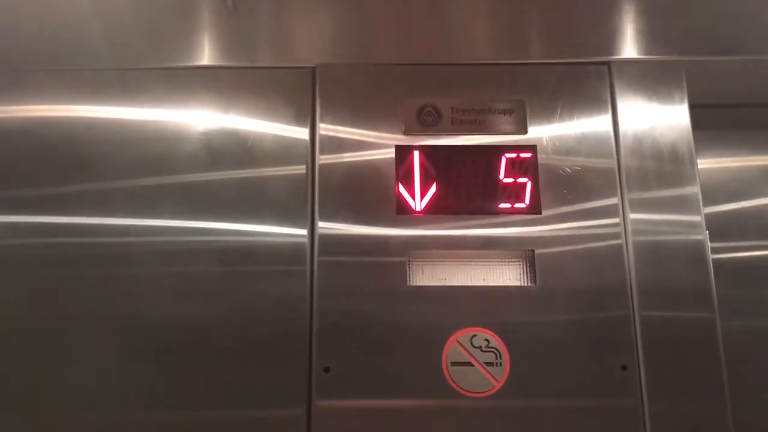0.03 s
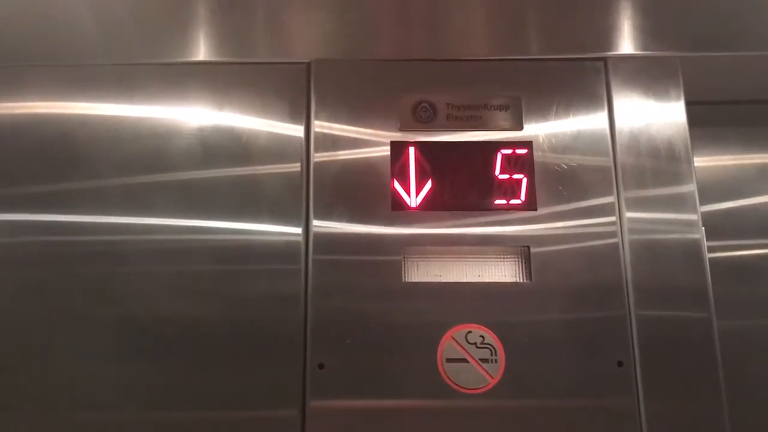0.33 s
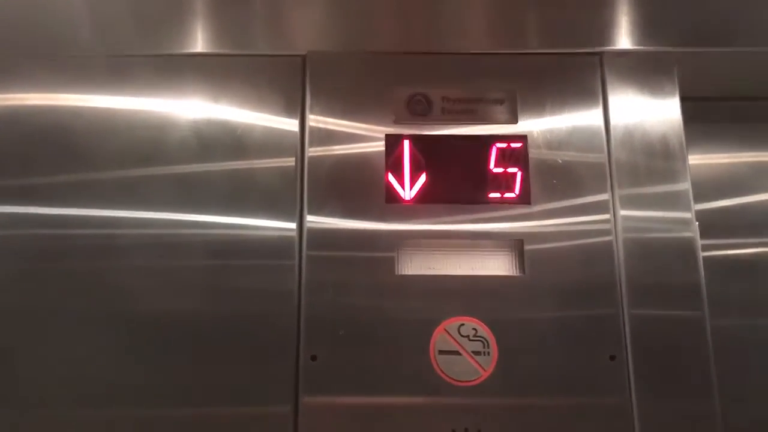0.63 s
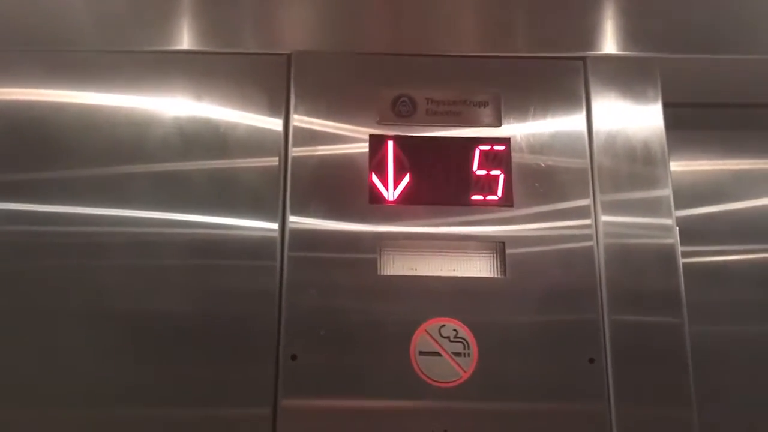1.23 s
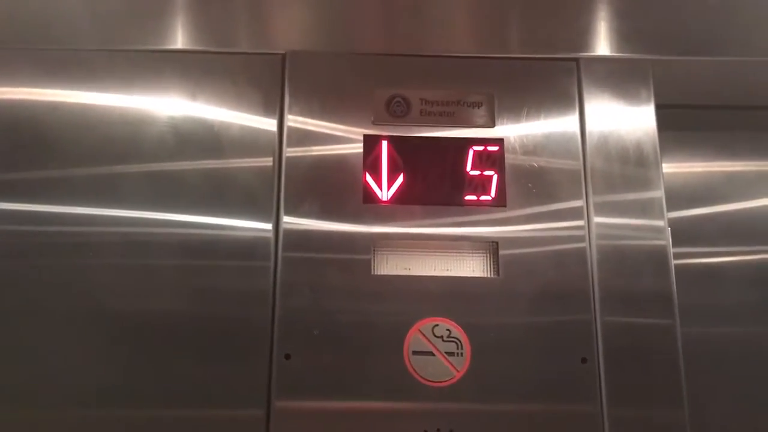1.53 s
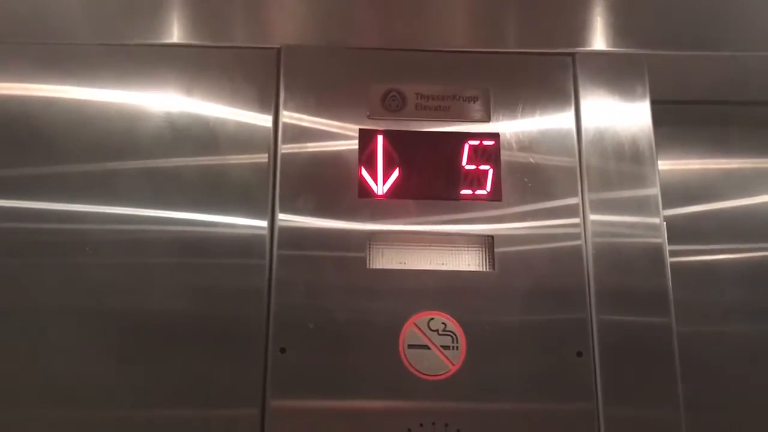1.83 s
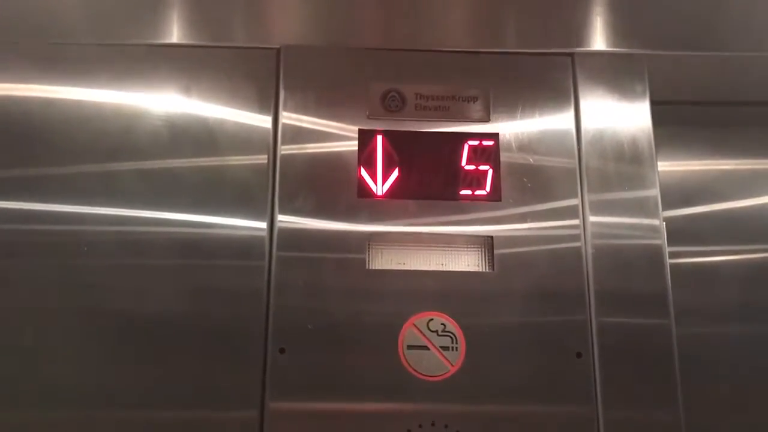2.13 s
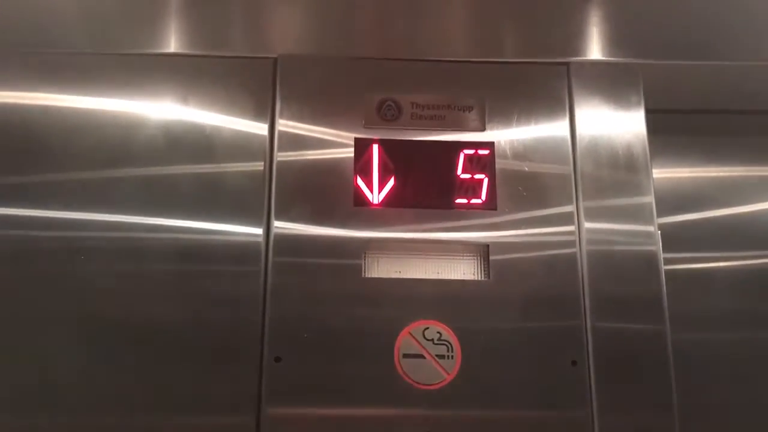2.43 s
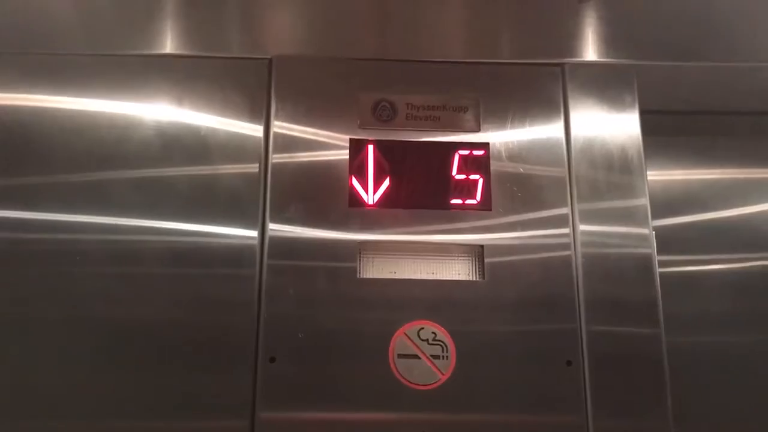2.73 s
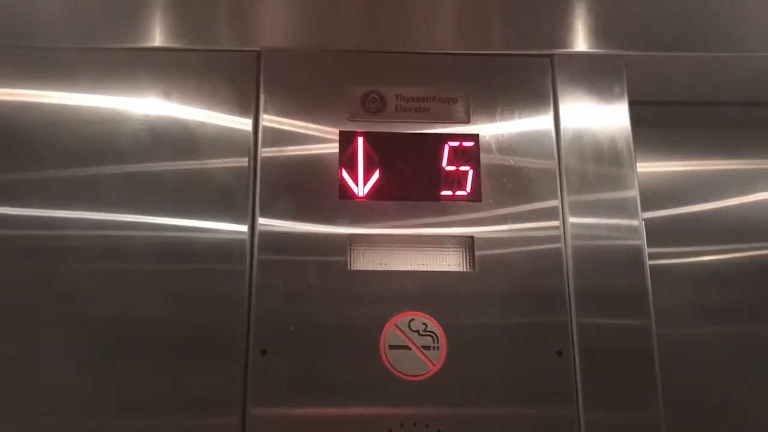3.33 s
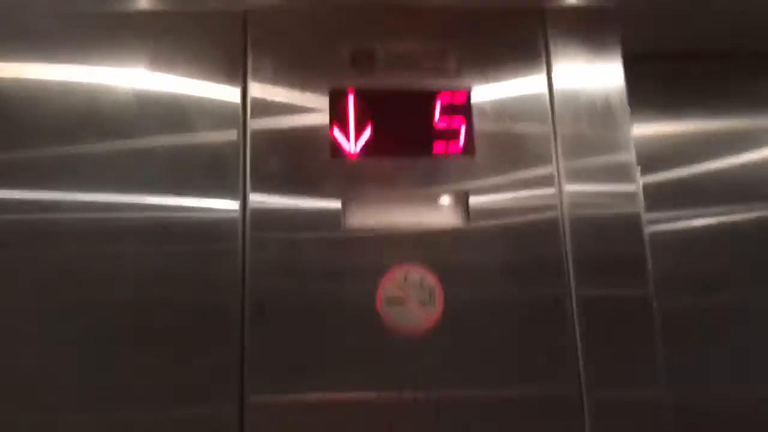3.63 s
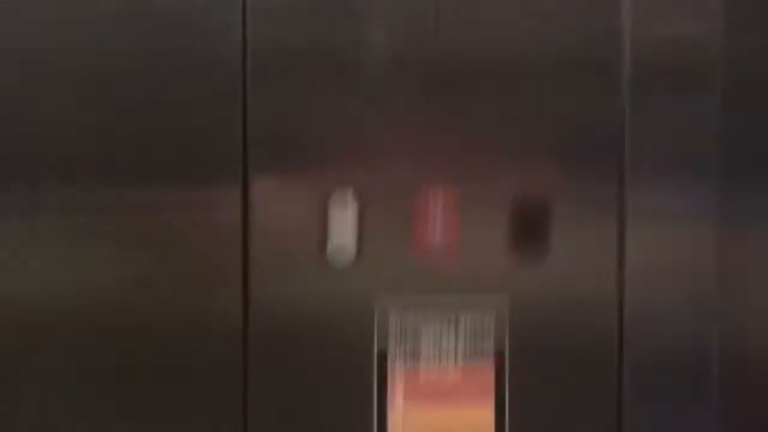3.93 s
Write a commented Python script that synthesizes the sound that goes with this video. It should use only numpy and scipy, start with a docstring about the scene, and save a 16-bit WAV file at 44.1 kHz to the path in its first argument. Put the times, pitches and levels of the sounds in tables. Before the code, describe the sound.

An elevator hums to a stop, then clicks and its sliding doors start rolling.

```python
"""A fan, a low boom and the hum and whine of the drive, heard inside a steel lift car coming to rest.
The drive cuts out; brake and levelling jolts stir the car's lowest air mode and shake its panels.
Relays and latches click, steel fittings ring on. The sliding doors unlock and start to roll,
knocking as they take up their slack. The ventilation fan runs throughout."""
import sys
import numpy as np
from scipy import signal
from scipy.fft import rfft, irfft
from scipy.io import wavfile

SR = 44100
rng = np.random.default_rng(int(sys.argv[2]) if len(sys.argv) > 2 else 0)


def file_out(sig):
    """Save sig as 16-bit WAV at sys.argv[1]."""
    # one column per channel
    cols = np.atleast_2d(sig).T
    # limit, then scale
    lim = np.clip(cols, -1, 1)
    pcm = np.round(lim * 32767).astype(np.int16)
    wavfile.write(sys.argv[1], SR, pcm)


N = 176400  # 4 s


def undb(db):
    """Decibels to gain."""
    return 10 ** (np.asarray(db) / 20)


def unit(x):
    """Scale to rms 1."""
    return x / np.sqrt(np.mean(x ** 2))


def clock():
    """Time of every sample, s."""
    return np.arange(N) / SR


def colour(x, spectrum):
    """Minimum-phase filter through (Hz, dB) points; white noise keeps its power."""
    hz, db = np.array(sorted(spectrum), float).T
    size = 2 * N
    bins_hz = np.maximum(np.arange(N + 1) * SR / size, 1)
    gain = unit(undb(np.interp(np.log(bins_hz), np.log(hz), db)))
    cepstrum = irfft(np.log(gain))
    cepstrum[1:N] *= 2
    cepstrum[N + 1:] = 0
    return irfft(rfft(x, size) * np.exp(rfft(cepstrum)))[:N]


def noise(spectrum):
    """Coloured noise, rms 1."""
    return unit(colour(rng.standard_normal(N), spectrum))


def gritty(spectrum, grains_per_s, grain_db):
    """Coloured noise with small random impacts in it, rms 1."""
    grains = unit((rng.random(N) < grains_per_s / SR) * rng.standard_normal(N))
    return unit(colour(rng.standard_normal(N) + undb(grain_db) * grains, spectrum))


def band(hz, width_hz):
    """Noise in one steep resonance, rms 1."""
    bins_hz = np.arange(N // 2 + 1) * SR / N
    detuning = (bins_hz - hz) / (width_hz / 2)
    return unit(irfft(rfft(rng.standard_normal(N)) / (1 + detuning ** 2), N))


def walk(rate_hz):
    """Smooth random wander, rms 1."""
    bins_hz = np.arange(N // 2 + 1) * SR / N
    return unit(irfft(rfft(rng.standard_normal(N)) * np.exp(-(bins_hz / rate_hz) ** 2), N))


def tones(rows, drift_hz, waver_db, rate_hz):
    """Machine tones wavering in pitch and level."""
    out = 0
    for hz, db in rows:
        rms = undb(db + waver_db * walk(rate_hz))
        phase = 2 * np.pi * np.cumsum(hz + drift_hz * walk(rate_hz)) / SR
        out += np.sqrt(2) * rms * np.sin(phase)
    return out


def swell(start_s, rise_s, t60_s, hold_s=0):
    """Linear rise, hold, exponential decay."""
    age_s = clock() - start_s
    decay = np.exp(-np.log(1000) * np.maximum(age_s - rise_s - hold_s, 0) / t60_s)
    return np.clip(age_s / rise_s, 0, 1) * decay


# Air noise spectra, main and treble (frequency [Hz], relative level [dB])
AIR_SPECTRUM = [(15, -29.5), (25, -1), (53, -14), (86, -8), (116, -12.5), (140, -23), (173, -18.5),
                (198, -21), (240, -20), (281, -27.5), (313, -30.5), (349, -28.5), (445, -27.5),
                (537, -30.5), (614, -34), (684, -38), (762, -33.5), (970, -37), (1050, -38), (1140, -38.5),
                (1400, -38.5), (2100, -47), (4750, -57.5), (7500, -66), (15500, -69)]
AIR_TREBLE_SPECTRUM = [(3000, -16), (5400, 1.5), (7500, 4), (12000, -1), (15500, -3.5)]
# Fan tones (frequency [Hz], level [dB])
FAN_TONES = [(80.7, -45), (119, -52), (161.5, -61), (231.5, -66.5), (317.6, -69.5), (446.8, -67),
             (1017, -74), (1082, -70)]
def fan(air_db=-43, treble_db=-75.5):
    """Ventilation fan: steady air noise and wavering tones."""
    air = undb(air_db) * noise(AIR_SPECTRUM) + undb(treble_db) * noise(AIR_TREBLE_SPECTRUM)
    return air + tones(FAN_TONES, drift_hz=1.13, waver_db=3.0, rate_hz=5.9)


BOOM_HZ = 83
# Boom envelope (time [s], level [dB])
BOOM_ENVELOPE = [(0, -39), (.7, -42.5), (.9, -73), (1.1, -45.5), (1.6, -37.5), (2.03, -36.5), (2.2, -54),
                 (2.55, -39), (2.9, -43), (3.12, -33), (3.4, -35.5), (4, -46)]
def boom():
    """The car's lowest air mode, stirred by the ride."""
    times_s, db = np.array(BOOM_ENVELOPE).T
    return undb(np.interp(clock(), times_s, db)) * band(BOOM_HZ, width_hz=33.5)


# Motor and inverter tones (frequency [Hz], level [dB])
MOTOR_TONES = [(268.5, -49.5), (387.6, -66), (506, -56.5), (538.3, -62), (560, -61), (699.8, -63.5),
               (762, -64), (780.6, -69.5), (829, -65.5), (1082, -75), (1351, -67.5), (1545, -72),
               (1700, -71.5), (2794, -71.5), (2858, -90)]
INVERTER_TONES = [(11859, -79.5), (12134, -78.5)]
# Resonances of the rushing noise (centre [Hz], width [Hz], level [dB])
RUSH_BANDS = [(272, 66, -54.5), (539.5, 31, -55.5), (791, 78, -55), (1075, 100, -63.5), (1296, 120, -69),
              (1550, 77, -67), (5440, 700, -87)]
# Motor whistle envelope (time [s], level [dB])
WHISTLE_ENVELOPE = [(0, -60.5), (.3, -74), (.65, -67.5), (.95, -66), (1.2, -66)]
# Drive hiss spectrum (frequency [Hz], relative level [dB])
HISS_SPECTRUM = [(150, -12), (300, -1.5), (480, 3), (630, -17), (900, -4), (1600, -8.5), (2000, -17.5),
                 (2700, -11.5), (3200, -23.5), (5700, -29), (7400, -43), (9200, -34), (10500, -37),
                 (15000, -39)]
def drive(cut_s=1.14, decay_tau_s=0.11, whine_fade_s=0.67, whine_fall_db_per_s=13):
    """Motor hum, rush, whistle and hiss die away at the power cut; the inverter whine fades earlier."""
    t = clock()
    hum = tones(MOTOR_TONES, drift_hz=1.88, waver_db=0.5, rate_hz=6.2)
    rush = sum(undb(db) * band(hz, width_hz) for hz, width_hz, db in RUSH_BANDS)
    times_s, whistle_db = np.array(WHISTLE_ENVELOPE).T
    whistle = undb(np.interp(t, times_s, whistle_db)) * band(hz=2810, width_hz=66)
    whine = tones(INVERTER_TONES, drift_hz=2.8, waver_db=0.5, rate_hz=12)
    whine += undb(-82) * band(hz=12240, width_hz=260)
    whine *= undb(-whine_fall_db_per_s * np.maximum(t - whine_fade_s, 0))
    hiss = undb(-55.5) * noise(HISS_SPECTRUM)
    running = np.exp(-np.maximum(t - cut_s, 0) / decay_tau_s)
    return running * (hum + rush + whistle + whine + hiss)


# Wall panel and fitting spectra (frequency [Hz], relative level [dB])
PANEL_SPECTRUM = [(60, -25), (120, -21), (185, -5.5), (205, -10), (228, -1), (252, 9), (285, -10.5),
                  (330, -8), (450, -8), (700, -29), (1500, -39.5), (4000, -61), (16000, -92.5)]
RATTLE_SPECTRUM = [(160, -30), (280, -25), (333, 3), (400, -4.5), (525, -16), (720, -7.5), (803, -13),
                   (1100, -7.5), (1330, -15.5), (1460, -9.5), (1790, -17), (2870, -24.5), (3470, -29.5),
                   (4530, -32.5), (5800, -40), (8000, -41), (15600, -80)]
# Car jolts (time [s], rise [s], hold [s], t60 [s], boom [Hz], boom [dB], panel [dB], rattle [dB])
JOLTS = [(0.486, 0.031, 0.0072, 0.17, 87.76, -31.5, -68, -79),
         (1.148, 0.034, 0.006, 0.09, 79.5, -35, -38, -50.5),
         (1.186, 0.023, 0.0085, 0.38, 80.9, -29, -37, -49.5),
         (1.35, 0.051, 0.0098, .28, 85.4, -25, -57, -61.5),
         (1.749, 0.019, 0.052, 0.17, 80.63, -27, -48.5, -46.5),
         (1.819, 0.04, 0.021, 0.54, 82, -24.5, -43.5, -49), (1.99, .02, .005, 0.16, 81.9, -33.5, -65, -59),
         (2.833, 0.018, 0.0048, 0.071, 85.96, -28, -71, -70),
         (3.184, 0.037, 0.027, 0.36, 87.6, -25, -40.5, -48)]
def jolts():
    """Each jolt swells the car's lowest air mode, shakes the panels and rattles the fittings."""
    panel = noise(PANEL_SPECTRUM)
    rattle = gritty(RATTLE_SPECTRUM, grains_per_s=400, grain_db=-5)
    shaking, boom_power = 0, 1e-12
    weighted_hz = boom_power * BOOM_HZ
    for start_s, rise_s, hold_s, t60_s, hz, boom_db, panel_db, rattle_db in JOLTS:
        envelope = swell(start_s, rise_s, t60_s, hold_s)
        shaking += envelope * (undb(panel_db) * panel + undb(rattle_db) * rattle)
        power = (envelope * undb(boom_db)) ** 2
        boom_power += power
        weighted_hz += power * hz
    phase = 2 * np.pi * np.cumsum(weighted_hz / boom_power) / SR  # one mode, power-weighted pitch
    return shaking + np.sqrt(2 * boom_power) * np.sin(phase)


CLICK_RISE_S = 0.002
# Ringing spectrum per switching part (frequency [Hz], relative level [dB])
PART_SPECTRA = {"brake": [(2120, -50), (3600, -26), (4220, -2.5), (4890, -19), (5330, -5), (5810, -2.5),
                (7610, -18), (10300, -24), (11500, -14), (14300, -18), (15600, -14)],
                "contact": [(1760, -49), (3000, -2), (3590, -11), (3820, -6), (4420, -12), (5000, -13),
                (5290, -7), (6240, -16), (7470, -9), (8390, 3), (10400, -26), (15600, -8)],
                "contactor": [(1470, -28), (2500, -3), (2960, -4), (3240, 1), (4440, -2), (4870, -8),
                (5940, 4), (6610, -11), (9340, -3), (10600, -11), (13000, -1), (15600, -15)],
                "relay": [(1120, -31), (1900, -4), (2170, -12), (2250, 2), (2730, -8), (3220, 2.5),
                (3950, -7), (4270, -7), (4790, -13), (5660, -10), (6300, -9), (7640, -14), (9030, 2),
                (9530, -5), (10700, -22), (12100, -10), (15600, -26)], "door relay": [(1290, -42),
                (2200, -12), (2720, -7), (3400, -1), (3750, -10), (4170, -7), (5740, -22), (6540, -4),
                (7160, -15), (7580, -11), (9010, -13), (9700, -5), (10400, -20), (11100, -8), (12300, -14),
                (14600, -7), (15600, -12)], "lock": [(1290, -46), (2200, -1.5), (3590, 1.5), (4610, -8),
                (4830, -4), (5500, -5.5), (7280, -17), (7950, -8), (8620, -21), (11300, -23), (15000, -33)],
                "hanger": [(1470, -33), (2500, 4.5), (2940, -22), (3610, 2), (3900, -4), (4370, -3),
                (7140, -8), (7770, -8.5), (11500, -5.5), (15600, -20)]}
# Clicks (time [s], level [dB], t60 [s], part)
CLICKS = [(1.044, -61, 0.088, "brake"), (1.066, -64, 0.36, "brake"), (1.126, -63.5, 0.18, "brake"),
          (1.1465, -60, 0.2, "brake"), (1.188, -68, 0.27, "brake"), (1.315, -67, 0.29, "brake"),
          (1.3476, -58, 0.33, "contact"), (1.403, -59, 0.27, "contactor"), (1.856, -67.5, 0.27, "brake"),
          (2.053, -48.5, .23, "relay"), (2.9195, -54, .21, "door relay"), (2.978, -64.5, 0.31, "lock"),
          (3.029, -70, 0.41, "lock"), (3.277, -62, 0.16, "lock"), (3.285, -60.5, 0.14, "hanger"),
          (3.338, -50, 0.43, "lock"), (3.423, -64, 0.33, "lock"), (3.546, -61.5, .2, "hanger"),
          (3.832, -74, 0.052, "lock"), (3.912, -53.5, 0.7, "hanger")]
def clicks(crack_db=-2, crack_tau_s=0.009):
    """A short crack and its reflections between steel walls, coloured by the part that snaps."""
    out, t = 0, clock()
    for name, spectrum in PART_SPECTRA.items():
        envelope = 0
        for start_s, db, t60_s, part in CLICKS:
            if part == name:
                crack = undb(crack_db) * np.exp(-abs(t - start_s) / crack_tau_s)
                envelope += undb(db) * swell(start_s, CLICK_RISE_S, t60_s) * (1 + crack)
        bursts = envelope * rng.standard_normal(N)
        flicker = undb(0.5 * walk(rate_hz=160))
        out += colour(bursts * flicker, spectrum)
    return out


# Modes of steel fittings (time [s], frequency [Hz], level [dB], t60 [s])
FITTING_MODES = [(1.349, 15330, -62, .08), (1.757, 4640, -69.5, 0.53), (1.855, 7930, -76.5, 0.72),
                 (1.855, 5800, -73, 0.34), (2.054, 2304, -64, .24), (2.054, 3004, -58, .15),
                 (2.054, 3295, -61, .28), (2.054, 8834, -60, .13), (2.054, 9308, -57, .16),
                 (2.225, 8000, -74, 0.27), (2.919, 3410, -61, 0.43), (2.919, 9744, -67, 0.22),
                 (2.919, 14200, -75, .2), (3.277, 4500, -61, .7), (3.426, 4630, -60, 0.47)]
def rings(wobble_hz=45):
    """Springs and loose fittings ring on after a click or jolt, buzzing slightly."""
    out, t = 0, clock()
    buzz_cycles = np.cumsum(wobble_hz * walk(rate_hz=150)) / SR
    for start_s, hz, db, t60_s in FITTING_MODES:
        phase = 2 * np.pi * (hz * (t - start_s) + buzz_cycles)
        out += undb(db) * swell(start_s, CLICK_RISE_S, t60_s) * np.sin(phase)
    return out


# Roller and track spectra (frequency [Hz], relative level [dB])
ROLLER_SPECTRUM = [(16, -23), (28, 2), (85, -1), (108, -1.5), (156, -10.5), (198, -15), (246, -9.5),
                   (285, -17.5), (425, -16), (696, -27), (777, -21.5), (899, -30), (985, -28.5),
                   (1740, -33.5), (2200, -38), (2860, -66), (4840, -120)]
TRACK_SPECTRUM = [(1290, -12), (2200, -3.5), (3340, -5), (3970, -3), (4870, -11), (5160, -10), (6440, -10),
                  (7580, -11.5), (9230, -12.5), (10300, -15.5), (15600, -25)]
# Rolling envelope (time [s], rumble [dB], track hiss [dB])
DOOR_ENVELOPE = [(2.9, -75, -92), (3.19, -41.5, -66), (3.25, -42, -64.5), (3.45, -33.5, -56),
                 (3.62, -35.5, -57.5), (3.74, -35.5, -57.5), (3.86, -36.5, -55), (4.0, -35.5, -58.5)]
def door_rollers():
    """Rollers rumble along the track, hissing and ticking over grit."""
    t = clock()
    times_s, rumble_db, hiss_db = np.array(DOOR_ENVELOPE).T
    rumble_gain = undb(np.interp(t, times_s, rumble_db) + 0.83 * walk(rate_hz=30))
    rumble = rumble_gain * noise(ROLLER_SPECTRUM)
    hiss_gain = undb(np.interp(t, times_s, hiss_db) + 1.57 * walk(rate_hz=25))
    return rumble + hiss_gain * gritty(TRACK_SPECTRUM, grains_per_s=260, grain_db=-10)


# Door leaf spectrum (frequency [Hz], relative level [dB])
LEAF_SPECTRUM = [(76, -29), (130, -14.5), (255, 1), (357, -17), (461, -5.5), (559, -28), (646, -15),
                 (1100, -15.5), (1250, -22), (1440, -22), (2020, -37), (2190, -33), (2920, -38),
                 (6000, -47), (7800, -57.5), (13200, -120)]
# Knocks (time [s], level [dB], t60 [s])
DOOR_KNOCKS = [(3.072, -51, .4), (3.285, -44.5, 0.3), (3.346, -42, 0.45), (3.449, -39, 0.45),
               (3.548, -40.5, 0.48), (3.571, -37, 0.41)]
def door_knocks(push_s=0.00374, push_db=16.5, rise_s=0.0096):
    """The door leaves take up their slack: a soft push, then ringing sheet metal."""
    out, t = 0, clock()
    sheet = noise(LEAF_SPECTRUM)
    for start_s, db, t60_s in DOOR_KNOCKS:
        push = undb(push_db) * np.sin(np.pi * np.clip((t - start_s) / push_s, 0, 1))
        out += undb(db) * (push + swell(start_s, rise_s, t60_s) * sheet)
    return out


# The car's low air modes and the microphone's treble dips (frequency [Hz], relative gain [dB])
CAR_AND_MIC_COLOUR = [(20, -19.5), (35, -1.5), (52, 0.5), (70, 0.5), (165, -1.5), (186, 4), (203, -9),
                      (222, 2), (300, -2), (332, 2.5), (360, -0.5), (4150, 1), (4600, 3.5), (4870, -0.5),
                      (5400, 3), (6700, 0), (7600, -4.5), (8300, -2), (9600, -1), (10400, -5),
                      (11200, -0.5), (15000, 0.5)]
def scene():
    """Machinery and doors share one tone colour; clicks and rings are added directly. Mono."""
    machinery = fan() + boom() + drive() + jolts() + door_knocks() + door_rollers()
    return (colour(machinery, CAR_AND_MIC_COLOUR) + clicks() + rings())[None]


def record(dry):
    """Steep low-pass on the top treble."""
    cutoff_hz = 15620
    return signal.sosfilt(signal.ellip(10, 0.2, 80, cutoff_hz, fs=SR, output="sos"), dry)


dry = scene()
out = record(dry)
file_out(out)
```